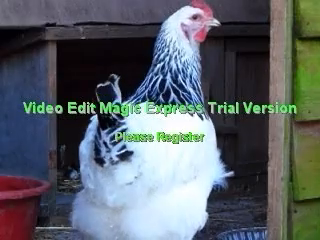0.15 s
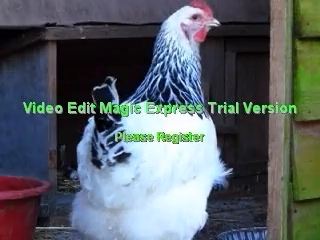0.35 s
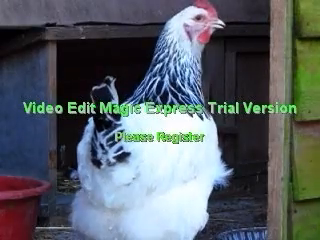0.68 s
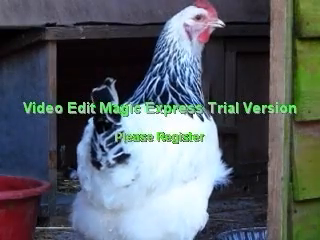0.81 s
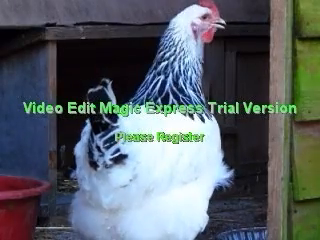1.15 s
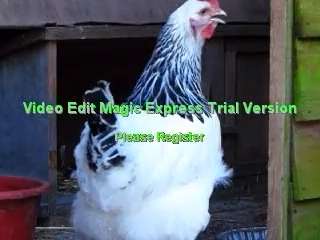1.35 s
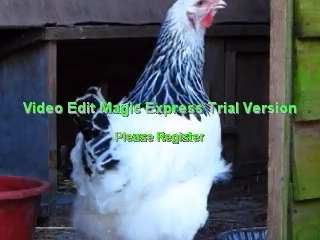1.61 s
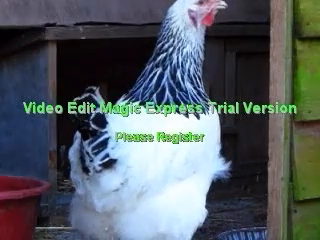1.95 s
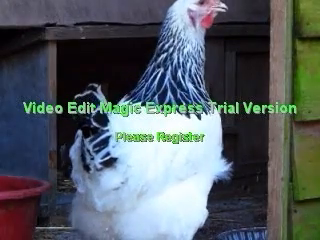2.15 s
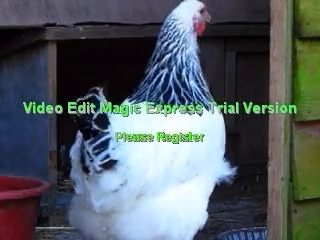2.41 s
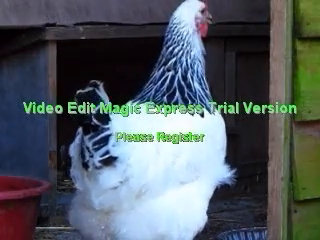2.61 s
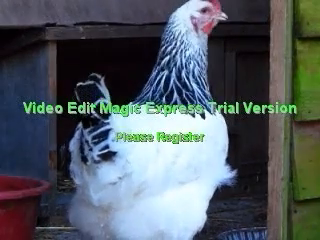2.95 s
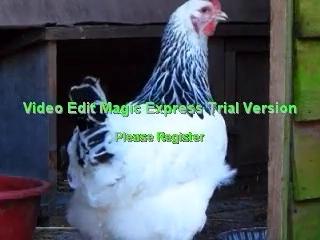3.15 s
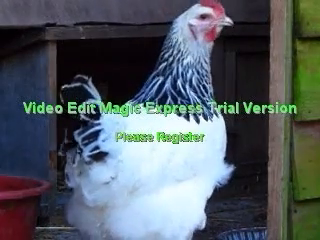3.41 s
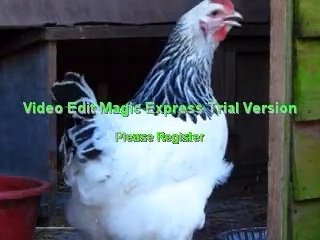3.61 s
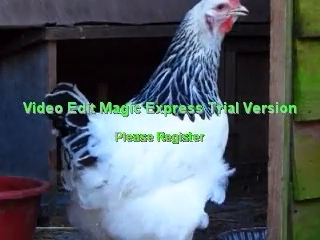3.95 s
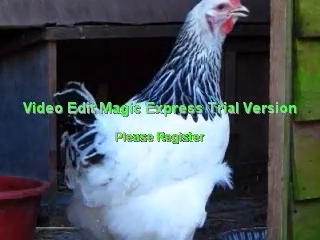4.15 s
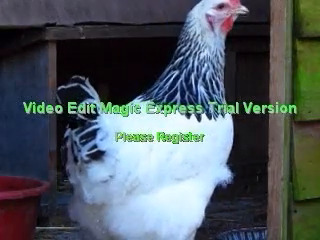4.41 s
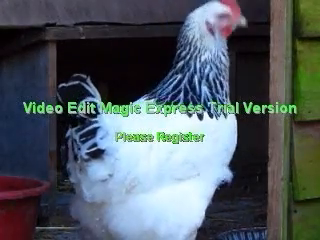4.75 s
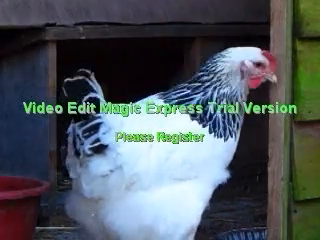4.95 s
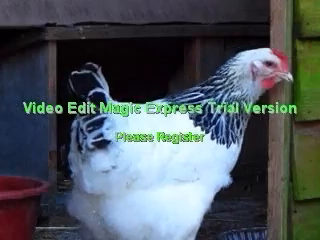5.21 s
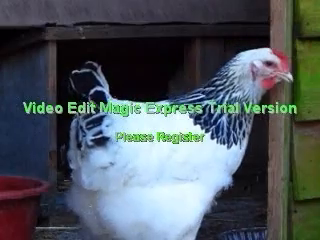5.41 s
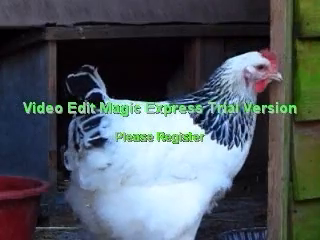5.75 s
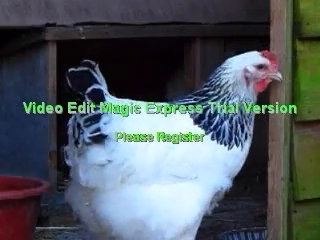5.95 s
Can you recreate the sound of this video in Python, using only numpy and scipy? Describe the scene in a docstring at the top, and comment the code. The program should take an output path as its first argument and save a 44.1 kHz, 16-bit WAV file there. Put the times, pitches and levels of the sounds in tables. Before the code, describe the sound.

Short raspy clucks from a hen build in loudness, interrupted by two drawn-out squawks at the doorway of a wooden coop.

```python
"""At the doorway of a wooden coop, a hen cackles: runs of rattling clucks, twice breaking into a long
clear squawk. Her voice is a source and a filter: the syrinx pulses, and throat, mouth and beak resonate.
As each squawk tires it dulls and its period doubles. Reflections off the boards add a short dull ring.
Underneath lie a few soft thumps, quiet outdoor air, a far rumble and hum, and a small camera's hiss
and thin whine."""
import sys
import numpy as np
from scipy import signal
from scipy.fft import rfft, irfft
from scipy.io import wavfile
from scipy.ndimage import uniform_filter1d, minimum_filter1d

SR = 44100
rng = np.random.default_rng(int(sys.argv[2]) if len(sys.argv) > 2 else 0)


def digitize_waveform(pressure):
    """Quantize a signal to 16-bit integers and store it at the path in sys.argv[1].

    Rows of a 2-D input are taken as channels; values are limited to [-1, 1].
    """
    field = np.atleast_2d(pressure).T
    bounded = np.clip(field, -1, 1)
    quanta = np.round(bounded * 32767).astype(np.int16)
    wavfile.write(sys.argv[1], SR, quanta)


N = 267687
T = np.arange(N) / SR


def undb(db):
    """Amplitude ratio of a level in decibels."""
    return 10 ** (np.asarray(db) / 20)


def unit(x):
    """Normalisation to unit rms."""
    return x / np.sqrt(np.mean(x ** 2) + 1e-18)


def smooth_step(t, width_s):
    """Sigmoid transition from 0 to 1, centred on t = 0."""
    return .5 + .5 * np.tanh(t / width_s)


def wander(rate_hz):
    """Random modulation: linearly interpolated noise of unit rms."""
    step = max(int(SR / rate_hz), 2)
    return unit(uniform_filter1d(np.repeat(rng.standard_normal(N // step + 1), step), step)[:N])


def resonate(x, hz, width_hz):
    """Two equal resonators in cascade, for steep skirts."""
    b, a = signal.iirpeak(hz, hz / width_hz, fs=SR)
    return signal.lfilter(b, a, signal.lfilter(b, a, x))


def formants(x, modes, tuning):
    """Resonators in parallel, their frequencies scaled by one factor."""
    return sum(undb(db) * resonate(x, hz * tuning, width) for hz, width, db in modes)


def add(out, x, centre_s):
    """Superposition of a short sound, centred on a time."""
    start = int(centre_s * SR) - len(x) // 2
    part = x[:max(N - start, 0)]
    out[start:start + len(part)] += part


# Spectrum of air and hiss: f/Hz, relative spectral density/dB
AIR_SPECTRUM = [(18, -33.5), (30, -2), (32, -7), (64, -9.5), (102, -9), (263, -13), (332, -14.5),
                (505, -13.5), (1440, -13), (1550, -14), (2070, -16), (3400, -15), (4090, -21),
                (7860, -25.5), (15500, -28)]
def air(level_db=-46):
    """Spectral shaping of white noise gives still air and hiss."""
    hz, db = np.transpose(AIR_SPECTRUM)
    f = np.maximum(np.fft.rfftfreq(N, 1 / SR), 1)
    shape = undb(np.interp(np.log(f), np.log(hz), db))
    return unit(irfft(rfft(rng.standard_normal(N)) * shape, N)) * undb(level_db)


# Envelopes of the low background: t/s, relative rumble level/dB, relative hum level/dB
LOW_ENVELOPES = [(0.0, -58, -61.5), (1.0, -44.5, -60), (1.45, -62.5, -70), (1.94, -59, -56.5),
                 (3.41, -53, -59), (4.31, -65, -69), (5.15, -59, -69), (5.53, -51.5, -67.5),
                 (6.07, -51.5, -62)]
def rumble_and_hum(rumble_gain_db=2.5, hum_gain_db=1):
    """Band-limited noise: a wide band is heard as a far rumble, a narrow one as a hum."""
    times, rumble_db, hum_db = np.transpose(LOW_ENVELOPES)
    rumble = unit(resonate(rng.standard_normal(N), hz=231, width_hz=200))
    rumble *= undb(rumble_gain_db + np.interp(T, times, rumble_db) + 1.2 * wander(4))
    hum = unit(resonate(rng.standard_normal(N), hz=137, width_hz=18))
    return rumble + hum * undb(hum_gain_db + np.interp(T, times, hum_db))


# Tones of the camera's whine: f/Hz, rms level/dB
WHINE_TONES = [(6051, -76), (8000, -69), (14050, -73)]
def whine():
    """Pure tones under slight random amplitude modulation."""
    return sum(np.sqrt(2) * undb(db + 1.7 * wander(10)) * np.sin(2 * np.pi * hz * T)
               for hz, db in WHINE_TONES)


THROAT_HZ, BEAK_HZ = 1047.3, 3385  # throat and beak resonances at a tuning of 1
# Formants of the vocal tract before tuning: f/Hz, bandwidth/Hz, gain/dB
THROAT_MODES = [(289, 133, -16), (780, 270, -13.5), (900.3, 144, 4.5), (1040.5, 123, 7.5),
                (1405, 130, -23.5)]
MOUTH_MODES = [(1899, 203, 7.5), (2074, 87, 6), (2858, 100, 0)]
BEAK_MODES = [(3431, 260, 21), (3900, 930, -22)]
def cluck(length_s, db, pair_hz, throat_hz, beak_hz, mouth_db, beak_db, tilt_db, jitter=.06,
          shimmer_db=3, weak_db=-6, rasp=.18, opening_s=.0065, glide=.057, size=8192):
    """Source and filter: uneven strong-weak pairs of syrinx pulses ring throat, mouth and beak."""
    t = (np.arange(size) - size // 2) / SR
    scatter = rng.standard_normal((size // 128, 2))
    times = np.cumsum(1 + jitter * scatter[:, 0]) / (2 * pair_hz)
    times -= times[0] + 1.1 * length_s
    strengths = undb(shimmer_db * scatter[:, 1] + weak_db * (np.arange(len(times)) % 2))
    pulses = np.histogram(times, size, (t[0], t[-1]), weights=strengths)[0]
    # air rushes through after every pulse
    airflow = signal.lfilter([1], [1, -np.exp(-1 / (.0012 * SR))], pulses)
    source = unit(pulses) + rasp * unit(airflow * rng.standard_normal(size))
    # only a muffled throat sound escapes until the beak opens; then the push dies away
    opened = smooth_step(t + .64 * length_s, opening_s)
    muffled = undb(-9.5) * (1 - opened) * np.clip(t / length_s + 1.4, 0, 1)
    push = muffled + opened * np.exp(-(np.maximum(t, 0) / (.52 * length_s)) ** 1.25)
    upper_push = opened * np.exp(-(np.abs(t - .00088) / (.75 * length_s)) ** 1.25)
    # positive tilt thins the throat's lower formants and lifts its highest
    throat = [(hz, width, gain + tilt_db * np.interp(hz, [400, 750, 1090, 1360], [-.4, -1.07, -.35, 1]))
              for hz, width, gain in THROAT_MODES]
    voice = unit(formants(source * push, throat, throat_hz / THROAT_HZ))
    voice += undb(mouth_db) * unit(formants(source * upper_push, MOUTH_MODES, tuning=.98))
    # pitch, throat and mouth start a little low and rise together
    position = np.cumsum(1 - glide * np.clip(-t / length_s, 0, 1))
    voice = np.interp(position - position[size // 2] + size // 2, np.arange(size), voice)
    voice += undb(beak_db) * unit(formants(source * upper_push, BEAK_MODES, beak_hz / BEAK_HZ))
    return voice * undb(db) * np.sqrt(length_s * SR / size)


def tissue(x, cutoff_hz=4500):
    """Absorption in soft tissue acts as a low-pass filter."""
    return signal.sosfilt(signal.butter(8, cutoff_hz, fs=SR, output="sos"), x)


# Clucks: centre t/s, length/s, relative level/dB, pulse-pair rate/Hz, beak f/Hz, brightness/dB
CACKLE = [(0.177, 0.031, -21.5, 156.1, 3324, 1), (0.462, 0.032, -18, 155.1, 3290, 1.5),
          (0.7, 0.037, -14, 182.1, 3287, 1.5), (.917, .039, -12, 182.4, 3260, .5),
          (1.127, 0.032, -11, 185.7, 3205, 3.5), (1.661, 0.036, -22, 199.5, 3440, 0),
          (1.886, 0.032, -19.5, 178.1, 3470, -.5), (2.15, 0.033, -21.5, 166.7, 3510, 0),
          (2.393, .027, -16.5, 173.5, 3310, -1.5), (2.638, 0.029, -14.5, 179.7, 3194, 0),
          (2.864, 0.034, -13, 182.8, 3166, -1), (3.082, .034, -11, 185.5, 3170, .5),
          (3.295, .031, -10, 190.2, 3256, 0.5), (3.503, .03, -10, 179.8, 3196, 3),
          (4.122, .041, -22, 193, 3580, -2.5), (4.503, 0.026, -20.5, 165.3, 3260, -5),
          (4.78, 0.026, -22, 162.5, 3550, -3.5), (5.085, .031, -15.5, 170.4, 3466, 1.5),
          (5.322, .03, -14, 143, 3400, 5.5), (5.551, .028, -13.5, 171.6, 3354, 3),
          (5.808, 0.031, -12.5, 177.2, 3490, -2.5), (6.041, .03, -10.5, 192.6, 3460, 1)]
def clucks(usual_db=-16, stoop_s=4.62, gain_db=-2.5):
    """Formants follow the shape of the tract, which changes with effort and as she lowers her head."""
    out = np.zeros(N)
    for centre_s, length_s, db, pair_hz, beak_hz, bright_db in CACKLE:
        effort_db = db - usual_db
        stoop = smooth_step(centre_s - stoop_s, width_s=.14)
        throat_hz = 1066.5 + 4.5 * effort_db + 12 * stoop
        throat_hz += .19 * (beak_hz - BEAK_HZ)  # a shorter tract raises both resonances
        mouth_db = -17 + bright_db - 3.5 * stoop
        beak_db = -19 + bright_db + stoop
        tilt_db = -3 - .18 * effort_db + 12 * stoop
        add(out, cluck(length_s, db, pair_hz, throat_hz, beak_hz, mouth_db, beak_db, tilt_db), centre_s)
    return tissue(out) * undb(gain_db)


# Decay of the coop's broad bands: f/Hz, reverberation time T60/s
COOP_DECAY = [(300, 0.54), (800, 0.21), (3300, 0.56)]
def coop(x, wet_db=-10.5, first_echo_s=.015, early_boost=2.2, early_s=.028, size=32768):
    """Reverberation: strong early reflections off the boards, then an exponential tail."""
    t, noise = np.arange(size) / SR, rng.standard_normal(size)
    ring = sum(resonate(noise, hz, 3.4 * hz) / np.sqrt(hz) * np.exp(-np.log(1000) * t / t60)
               for hz, t60 in COOP_DECAY)
    ring *= (t > first_echo_s) * (1 + early_boost * np.exp(-np.abs(t - first_echo_s) / early_s))
    # unit power gain within an octave of the throat resonance
    f = np.fft.rfftfreq(size, 1 / SR)
    throat_band = (f > THROAT_HZ / 2) & (f < 2 * THROAT_HZ)
    ring /= np.sqrt(np.mean(np.abs(rfft(ring)[throat_band]) ** 2))
    return signal.fftconvolve(x, ring)[:N] * undb(wet_db)


def voice_cracks(start, end, lead_s=.0015):
    """Onset and offset transients: the voice cracks brightly into a squawk and rattles out of it."""
    out = np.zeros(N)
    crack = cluck(length_s=.0065, db=-18, pair_hz=325, throat_hz=1342, beak_hz=3144,
                  mouth_db=-1.5, beak_db=-4, tilt_db=1, jitter=.16)
    rattle = cluck(length_s=.02, db=-24.5, pair_hz=270, throat_hz=1048, beak_hz=3424,
                   mouth_db=-7, beak_db=-10, tilt_db=1)
    add(out, crack, start - lead_s)
    add(out, rattle, end)
    return tissue(out)


def squawk_pitch(start, end, base_hz, rise, sag=.011, fall=.095, fall_s=.017):
    """The fundamental f0 sags for a third of the note, climbs, and falls at the very end."""
    arc = np.interp((T - start) / (end - start), [0, .33, 1], [sag, 0, rise])
    return base_hz * (1 + arc - fall * np.clip(1 + (T - end) / fall_s, 0, 1))


# Partials of a squawk: frequency ratio f/f0, relative level/dB
ODD_HARMONICS = [(1, 1), (3, 0)]
BEAK_HARMONICS = [(5, 2.5), (6, 1), (7, -0.5), (8, -8), (9, -3.5), (10, -7.5)]
HALF_HARMONICS = [(.5, -18), (1.5, -10), (2.5, -5), (3.5, -2.5), (4.5, -13.5), (6.5, -11.5)]
# Formants of the wide-open beak before tuning: f/Hz, bandwidth/Hz, gain/dB
GAPE_MODES = [(2620, 330, 4), (3160, 260, 4), (3390, 200, 5), (3740, 400, -6), (4800, 1200, -23)]
def squawk(start, tires, end, level_db, base_hz, rise, bright_db, fresh_odd_db, half_db,
           jitter=.003, fade_db_per_s=14.5, swell_db_per_s=45, doubling_s=.035, ramp_s=.0035):
    """Throat resonance selects the second harmonic; period doubling sets in as the voice tires."""
    tired = smooth_step(T - tires, width_s=.0079)
    db = level_db - fade_db_per_s * np.clip(T - tires, 0, end - tires)
    fresh_mouth_db = -19 + swell_db_per_s * np.clip(T - start, 0, end - start)
    mouth_db = (1 - tired) * fresh_mouth_db - 22.5 * tired
    odd_db = (1 - tired) * fresh_odd_db - 23.5 * tired
    beak_db = bright_db - 11 * tired
    pitch_hz = squawk_pitch(start, end, base_hz, rise) * (1 + jitter * wander(390))
    phase = 2 * np.pi * np.cumsum(pitch_hz) / SR
    gate = uniform_filter1d(1. * ((T > start) & (T < end)), int(ramp_s * SR))

    def partials(lines, flutter_db=3.5):
        """Phase-locked sinusoids, each wavering in level."""
        return unit(sum(undb(line_db + flutter_db * wander(45)) * np.sin(ratio * phase)
                        for ratio, line_db in lines))

    tone = partials([(2, 0)], flutter_db=.1) + undb(odd_db) * partials(ODD_HARMONICS)
    tone += undb(mouth_db) * partials([(4, 0)])
    tone += undb(beak_db) * formants(partials(BEAK_HARMONICS), GAPE_MODES, tuning=.99)
    doubling = undb(half_db) * partials(HALF_HARMONICS) * np.clip((T - tires) / doubling_s, 0, 1)
    # a little air escapes once a cycle
    breath = rng.standard_normal(N) * (1 + np.cos(phase))
    low_rasp = formants(breath, THROAT_MODES, tuning=.94)
    high_rasp = formants(breath, MOUTH_MODES, tuning=1) + .5 * formants(breath, BEAK_MODES, tuning=.94)
    rasp = undb(-37) * unit(low_rasp) + undb(-31) * unit(high_rasp)
    return gate * undb(db) * (tone + doubling + rasp)


# Squawks: start t/s, tiring t/s, end t/s, level/dB, base f0/Hz, fractional pitch rise,
# then relative to the note: beak harmonic gain/dB, odd harmonic level/dB, half harmonic level/dB
SQUAWK_CALLS = [(1.221, 1.362, 1.476, -12, 527.3, .048, -14.5, -21, -32),
                (3.598, 3.776, 3.879, -12.5, 520, .076, -21, -31.5, -16.5)]
def squawks():
    """Each call is a sustained oscillation between two transients; returns cracks and notes."""
    cracks = sum(voice_cracks(start, end) for start, _, end, *_ in SQUAWK_CALLS)
    notes = sum(squawk(*call) for call in SQUAWK_CALLS)
    return cracks, notes


# Soft low thumps: t/s, length/s, level/dB, f/Hz
LOW_THUMPS = [(3.287, 0.014, -30.5, 140), (3.32, 0.012, -26.5, 143), (3.469, 0.028, -44, 122),
              (3.633, 0.012, -38, 158), (3.705, 0.019, -36.5, 134), (3.87, 0.0095, -39.5, 151),
              (3.991, 0.011, -36.5, 135), (4.018, 0.019, -38, 179), (4.19, 0.022, -48.5, 139),
              (5.939, 0.0037, -34.5, 203)]
def thumps(deep_db=-6.5, lead_s=.0056, size=8192):
    """Heavily damped resonance: a noise burst excites a few low cycles and some deeper weight."""
    out, t = np.zeros(N), (np.arange(size) - size // 2) / SR
    for centre_s, length_s, db, hz in LOW_THUMPS:
        burst = rng.standard_normal(size) * np.exp(-((t + lead_s) / length_s) ** 2)
        bump = unit(resonate(burst, hz, .66 * hz))
        bump += undb(deep_db) * unit(resonate(burst, hz=92, width_hz=81))
        add(out, bump * undb(db) * np.sqrt(2 * length_s * SR / size), centre_s)
    return out


def scene():
    """Superposition of the hen's direct sound, its reflections, the thumps and the background."""
    cackle = clucks()
    cracks, notes = squawks()
    echoes = coop(cackle + cracks + undb(-1.5) * notes)
    return (cackle + cracks + notes + echoes + thumps() + air() + rumble_and_hum() + whine())[None]


def record(dry, ceiling=.42, hold_s=.002, cutoff_hz=15600, dc_offset=-.0326):
    """Fast peak limiting, then band limiting and a small constant offset."""
    hold = int(hold_s * SR)
    needed_gain = ceiling / np.maximum(np.abs(dry), ceiling)
    gain = uniform_filter1d(minimum_filter1d(needed_gain, 2 * hold), hold)
    low_pass = signal.ellip(10, .1, 80, cutoff_hz, fs=SR, output="sos")
    return signal.sosfilt(low_pass, dry * gain) + dc_offset


dry = scene()
out = record(dry)
digitize_waveform(out)
```